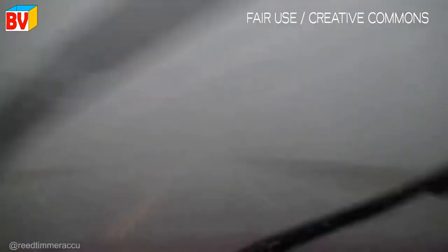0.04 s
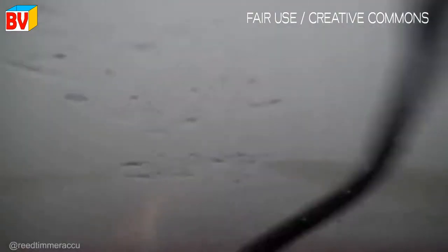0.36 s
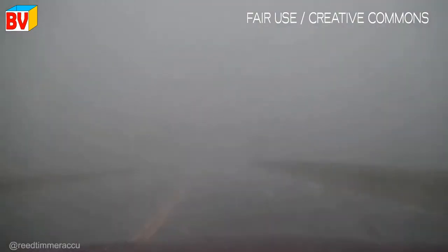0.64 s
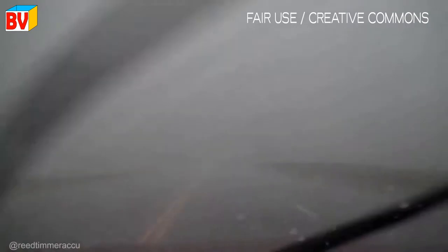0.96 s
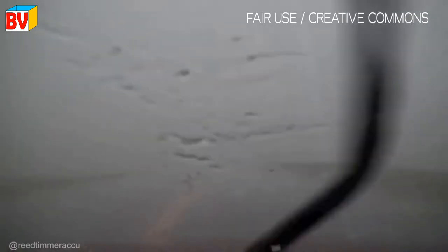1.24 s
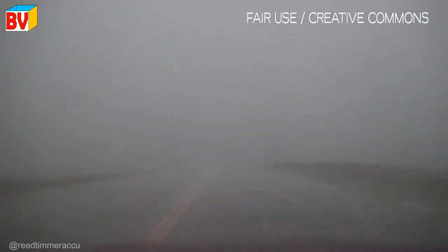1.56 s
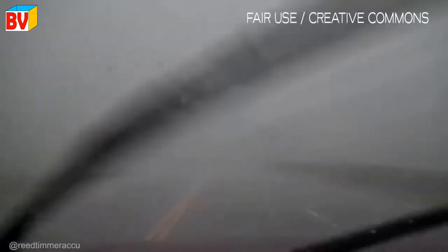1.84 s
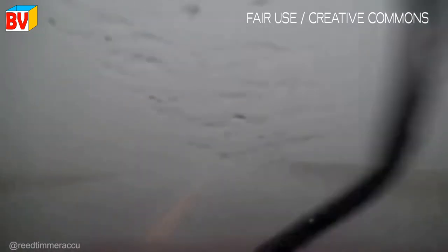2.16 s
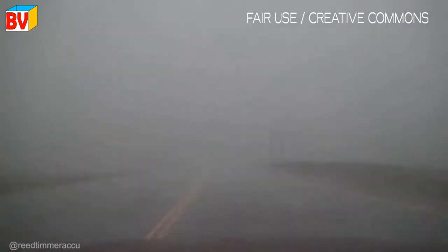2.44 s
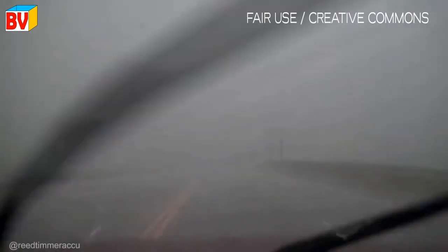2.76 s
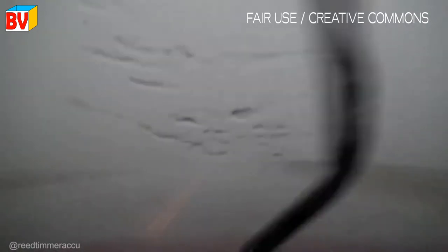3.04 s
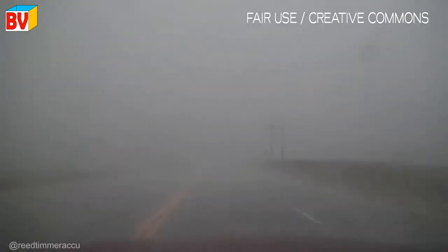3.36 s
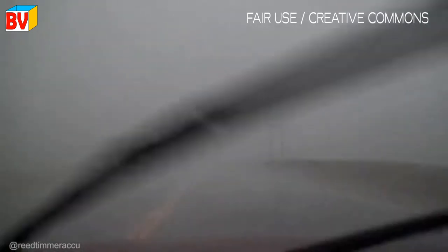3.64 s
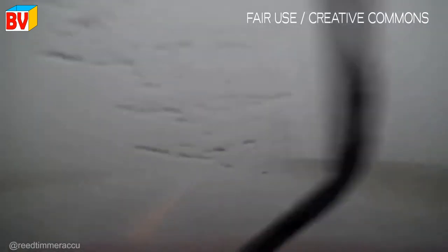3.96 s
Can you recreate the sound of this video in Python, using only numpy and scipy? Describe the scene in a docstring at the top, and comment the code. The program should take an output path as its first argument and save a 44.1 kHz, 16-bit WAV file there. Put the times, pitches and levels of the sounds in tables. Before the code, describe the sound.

Hailstones knock and clack unevenly on a creeping car from start to finish, heard inside. Each blow is short, the deeper ones booming briefly, while small ice pellets tick on the glass over constant rain hiss and engine rumble.

```python
"""A wash of heavy rain and low road rumble, with hail striking at once, heard inside a creeping car.
Stones thud and knock on the roof, crack on the windscreen and set the cabin air booming; each blow
is a spike plus a short, dense tail of reflections. Ice pellets tick on the glass.
A limiter holds down the hardest blows."""
import sys
import numpy as np
from scipy import signal
from scipy.fft import rfft, irfft
from scipy.io import wavfile
from scipy.ndimage import uniform_filter1d

SR = 44100
rng = np.random.default_rng(int(sys.argv[2]) if len(sys.argv) > 2 else 0)


def inscribe(sig):
    """Save sig as 16-bit PCM at rate SR to the path in sys.argv[1].

    A 1-D sig is mono; a 2-D sig holds one channel per row.
    Samples are clipped to [-1, 1] before scaling.
    """
    pcm = np.round(np.clip(np.atleast_2d(sig).T, -1, 1) * 32767)
    wavfile.write(sys.argv[1], SR, pcm.astype(np.int16))


N = 176400


def amp(db):
    """Decibels to gain."""
    return 10 ** (np.asarray(db) / 20)


def unit(x):
    """Scales to energy 1."""
    return x / np.sqrt(np.sum(x ** 2) + 1e-20)


def read(points, hz):
    """Interpolates a table on a log-frequency axis."""
    points_hz, values = np.transpose(points)
    return np.interp(np.log(hz + 1), np.log(points_hz + 1), values)


def add(mix, start_s, sound):
    """Mixes a sound in at start_s."""
    part = mix[round(start_s * SR):][:len(sound)]
    part += sound[:len(part)]


def band(x, low_hz, high_hz, order):
    """Causal band-pass; order sets the upper slope."""
    low_cut = signal.butter(3, low_hz, "high", fs=SR, output="sos")
    high_cut = signal.butter(order, high_hz, fs=SR, output="sos")
    return signal.sosfilt(np.vstack([low_cut, high_cut]), x + 1e-15)


def ring(x, hz, q):
    """One resonance, peak gain 1."""
    return signal.lfilter(*signal.iirpeak(hz, q, SR), x)


def drifting_noise(spectrum, patch_db, swell_db):
    """Noise of a given spectrum with drifting patches and a slow swell."""
    _, _, bins = signal.stft(rng.standard_normal(N), SR, nperseg=512)
    patches = uniform_filter1d(rng.standard_normal(bins.shape), size=7, axis=0)
    patches = uniform_filter1d(patches, size=9, axis=1)
    swell = uniform_filter1d(rng.standard_normal(bins.shape[1]), size=30)
    drift = amp(patch_db * patches / patches.std() + swell_db * swell / swell.std())
    noise = signal.istft(bins * drift, SR, nperseg=512)[1][:N]
    colour = amp(read(spectrum, np.fft.rfftfreq(N, 1 / SR)))
    return irfft(rfft(noise) * colour, N) * np.sqrt(SR / 2)


def blow(low_hz, high_hz, decay_s, direct_share, pitch_hz=1000, q=1, boost=0, order=4):
    """A direct spike and its reflections ring a panel; energy equals 30 ms at rms 1."""
    t = np.arange(SR // 6) / SR
    build_s = 0.0032 * (1 - direct_share) ** 2 + 1e-5  # far blows swell as they spread through the body
    swell = 1 - np.exp(-t / build_s)
    t60_s = decay_s * (1 - 0.3 * direct_share)  # direct blows on glass die sooner than on the roof
    age = t / t60_s
    early = amp(-60 * np.maximum(age - 0.031, 0))  # brief hold, then decay
    late = amp(-8.5 - 60 * age / 2.68)  # the cabin's weaker, longer tail
    drive = np.array([t == 0, rng.standard_normal(len(t)) * swell * (early + late)])
    spike, scatter = band(drive + boost * ring(drive, pitch_hz, q), low_hz, high_hz, order)
    hit = np.sqrt(direct_share) * unit(spike) + np.sqrt(1 - direct_share) * unit(scatter)
    return unit(hit) * np.sqrt(0.03 * SR)


# Rain spectrum: freq_hz, density_db
RAIN_SPECTRUM = [(100, -61), (300, -81), (600, -74), (1100, -79), (1700, -79), (2600, -83), (4300, -83),
                 (6500, -88.5), (9000, -92), (13000, -105), (15500, -106)]


def rain_wash():
    """Countless drops on the body merge into a hiss."""
    return drifting_noise(RAIN_SPECTRUM, patch_db=1.5, swell_db=0.7)


# Road and engine spectrum: freq_hz, density_db
RUMBLE_SPECTRUM = [(15, -85), (27, -87), (42, -62.5), (58, -79), (85, -62.5), (113, -53), (150, -58),
                   (220, -72.5), (400, -66.5), (1000, -100)]


def road_rumble():
    """Road and engine fill the cabin with low noise."""
    return drifting_noise(RUMBLE_SPECTRUM, patch_db=1, swell_db=0.6)


def patter(rate_per_s, low_hz, high_hz, decay_s, direct_share, level_db, spots=16):
    """Random small impacts of uneven size on spots of the body, each with its own pitch."""
    size_db = 5 * np.minimum(rng.exponential(1, N), 3.5)
    impacts = amp(size_db) * (rng.random(N) < rate_per_s / SR)
    spot = rng.integers(0, spots, N)
    out = np.zeros(N)
    for k, pitch_hz in enumerate(np.geomspace(low_hz, high_hz, spots)):
        response = blow(low_hz, high_hz, decay_s, direct_share, pitch_hz, q=2.95, boost=2.9)
        out += signal.oaconvolve(impacts * (spot == k), response)[:N]
    return amp(level_db) * unit(out) * np.sqrt(N)


# Hailstone impacts: start_s, thud_hz, thud_db, knock_hz, knock_db, crack_hz, crack_db,
# splinter_db, directness (0-1)
HAILSTONES = [(0.062, 248, -18.5, 1590, -25, 3580, -27, -36.5, 0.76),
              (0.0918, 319, -19.4, 977, -24.5, 2200, -37, -54, 0.7),
              (0.118, 404, -21.5, 1960, -27.5, 2030, -26.5, -32, 0.81),
              (0.157, 202, -30, 864, -33.6, 2200, -50, -64.4, 0.85),
              (0.2598, 411.6, -25.5, 525, -25.5, 4400, -47, -65, 0.67),
              (0.3291, 297.3, -25.5, 556, -20.7, 4683, -34.5, -45.5, 0.5),
              (0.3596, 211, -22, 893, -20.5, 4984, -34, -45, 0.44),
              (0.3969, 201.6, -19, 720, -23.5, 3680, -27, -36, 0.92),
              (0.4733, 445, -22, 851, -24, 2160, -33.5, -48, 0.47),
              (0.519, 321, -29, 624, -25.5, 2200, -67.5, -69, 0.67),
              (0.591, 374, -30.3, 1012, -27.5, 2160, -36, -51.2, 0.3),
              (0.6956, 398, -23.5, 672, -27, 2200, -55, -67.5, 0.68),
              (0.7732, 170.3, -31.5, 690, -34.5, 3920, -28.5, -39.5, 0.15),
              (0.818, 185.6, -30.5, 740, -27.5, 2720, -33.1, -42, 0.5),
              (0.8335, 339, -23.5, 563, -21.5, 2080, -33, -46.5, 0.38),
              (0.9051, 415, -25, 704, -29.5, 2640, -26, -32, 0.25),
              (0.941, 363, -18.5, 662, -21.5, 2900, -33.5, -54.5, 0.14),
              (0.9982, 142.4, -15.5, 710, -22.5, 2200, -54, -66, 0.15),
              (1.03, 167, -33, 656, -40, 3180, -43.5, -64, 0.05),
              (1.111, 189, -23.5, 591, -25, 2270, -35.6, -56.5, 0.32),
              (1.1977, 327, -25.5, 1031, -24, 3330, -36.5, -51.5, 0.51),
              (1.377, 176, -26.5, 693.6, -30, 3310, -43.5, -46.5, 0.6),
              (1.4163, 144, -41, 1530, -24.5, 5030, -26.5, -35.5, 0.99),
              (1.5266, 293, -28.5, 1764, -24, 3046, -30.5, -59, 0.74),
              (1.5641, 181, -27.5, 705, -21, 3130, -27.5, -40.5, 0.65),
              (1.691, 381, -21.5, 775, -19, 2050, -36, -42, 0.35),
              (1.8803, 185, -22, 925, -25.5, 2765, -26.4, -51, 0.73),
              (1.9105, 243.6, -22.5, 1880, -26.5, 2990, -28.9, -31.5, 0.84),
              (2.095, 144, -36, 1520, -38.4, 4530, -35.5, -35.5, 1),
              (2.11, 309, -27, 673, -33, 2200, -42.0, -64, 0.36),
              (2.1547, 403, -21, 678, -23.5, 2754, -32.5, -40.5, 0.93),
              (2.1907, 417, -31.5, 1130, -25, 4450, -30, -42.8, 1),
              (2.2293, 178, -21, 662, -24, 2200, -42.5, -54, 0.22),
              (2.256, 384.3, -21, 549, -30, 2200, -40, -51.5, 1),
              (2.267, 277, -17, 554, -28, 2870, -35, -36.5, 0.23),
              (2.3063, 219, -21, 1694, -25, 2104, -32.5, -40, 1),
              (2.382, 265, -27.5, 860, -28.5, 5652, -45, -56.5, 0.75),
              (2.4129, 258, -23.5, 1900, -26, 4420, -25, -35.5, 0.35),
              (2.4544, 438, -29, 1540, -26.0, 5950, -27.5, -36.5, 1),
              (2.58, 294, -25.5, 746, -29, 2170, -44.5, -52.5, 0.62),
              (2.7521, 396, -27, 1112, -31.5, 4650, -42.5, -51.5, 0.54),
              (2.934, 331, -30.5, 705, -35, 4597, -50, -59, 0.27),
              (3.0188, 384, -20, 758, -25, 3940, -25, -39.5, 0.42),
              (3.063, 159, -26.6, 633, -30.6, 2277, -49, -64.6, 0.75),
              (3.098, 380, -24, 1095, -23, 4130, -33, -45, 0.76),
              (3.165, 260, -42, 890, -44, 2400, -53, -55, 0.2),
              (3.2183, 431, -21.0, 850, -25.5, 2150, -29, -37, 0.84),
              (3.2448, 372, -24.5, 744, -21, 2600, -40.5, -58.5, 0.83),
              (3.316, 266.6, -26, 520, -37, 3380, -46, -50, 0.13),
              (3.356, 303, -28, 793, -35, 2500, -44, -55, 0.37),
              (3.377, 347, -18, 982, -23.5, 2500, -38.5, -54.5, 0.84),
              (3.475, 328, -23.5, 506, -29.5, 2200, -50, -62.5, 0.1),
              (3.5108, 239.7, -21.5, 1749, -29, 4575, -22, -29, 0.62),
              (3.617, 255, -19.5, 544, -20, 2560, -24, -34.5, 0.6),
              (3.656, 372, -28.5, 620, -23, 2180, -43, -59.5, 0.75),
              (3.753, 382, -24.5, 710, -30, 2180, -46, -54.6, 0.3),
              (3.775, 154, -25, 694, -32.1, 2200, -47.5, -65, 0.96),
              (3.8285, 266, -20, 570, -25.5, 4860, -30.5, -40, 0.85),
              (3.862, 156, -24.5, 1824, -30.5, 2200, -45, -65, 0.18),
              (3.8984, 339, -20.5, 659, -27.5, 3940, -34, -38, 0.05),
              (3.9459, 152.2, -19.5, 695, -22.5, 2220, -39, -50.5, 0.47),
              (3.958, 140, -18.5, 1447, -25, 3070, -27.5, -38, 0.36),
              (3.9905, 177, -24, 1238, -23, 2200, -38, -45, 0.8)]


def hail():
    """Each stone: a thud of the whole panel, a knock where it lands, a crack and splintering ice."""
    out = np.zeros(N)
    for stone in HAILSTONES:
        start_s, thud_hz, thud_db, knock_hz, knock_db, crack_hz, crack_db, splinter_db, directness = stone
        # a spot that rings lower is deeper and duller overall
        thud_low_hz = 111.3 * (thud_hz / 280) ** 0.43
        knock_high_hz = 1500 * (knock_hz / 800) ** 0.43
        crack_high_hz = 5120 * (crack_hz / 3300) ** 0.2
        thud = blow(thud_low_hz, 456, 0.099, 0.67 * directness, thud_hz, q=9.9, boost=2.2)
        knock = blow(450, knock_high_hz, 0.074, 0.719 * directness, knock_hz, q=7.6, boost=1.92)
        crack = blow(1850, crack_high_hz, 0.069, 0.76 * directness, crack_hz, q=8, boost=1.7)
        splinter = blow(5370, 8800, 0.054, 0.728 * directness, order=2)
        add(out, start_s, amp(thud_db) * thud + amp(knock_db) * knock)
        add(out, start_s, amp(crack_db) * crack + amp(splinter_db) * splinter)
    return out


def glass_clacks():
    """Stones ring the glass near one pitch, louder the more they both knock and crack."""
    out = np.zeros(N)
    for start_s, _, _, _, knock_db, _, crack_db, _, directness in HAILSTONES:
        clack = blow(1400, 2900, 0.042, 0.5 * directness, pitch_hz=1680, q=3.7, boost=1.02)
        add(out, start_s, amp((knock_db + crack_db) / 2 - 3.5) * clack)
    return out


def cabin_boom(pitch_hz=107.7, t60_s=0.15):
    """Each thud drives the lowest mode of the cabin air; deeper thuds drive it harder."""
    t = np.arange(SR // 4) / SR
    attack = 1 - np.exp(-2 * pitch_hz * t)
    mode = np.cos(2 * np.pi * pitch_hz * t) * attack * amp(-60 * t / t60_s)
    out = np.zeros(N)
    for start_s, thud_hz, thud_db, *_ in HAILSTONES:
        coupling = amp(-6) * (150 / thud_hz) ** 1.14
        add(out, start_s, amp(thud_db) * coupling * mode)
    return out


# Ice pellets on the glass: start_s, relative_db
ICE_PELLETS = [(0.0828, -47.5), (0.2844, -38.5), (1.3873, -35.5), (1.762, -32), (1.858, -40.5),
               (1.932, -46.5), (2.4476, -29.5), (2.633, -41), (2.6624, -34.5), (2.7777, -35), (2.831, -45),
               (2.9091, -37.5), (2.9408, -44.8), (3.4104, -39), (3.5938, -49)]


def pellets(gain_db=-4):
    """Light ice ticks on the windscreen without moving the panel."""
    out = np.zeros(N)
    for start_s, relative_db in ICE_PELLETS:
        tick = blow(2685, 9260, decay_s=0.0232, direct_share=0.36, order=2)
        add(out, start_s, amp(relative_db + gain_db) * tick)
    return out


# Glass and cabin resonances: centre_hz, width_hz, boost_ratio
CABIN_MODES = [(175.2, 60, 0.321), (610.2, 47.5, 0.54), (683, 55, 0.43), (1065, 23.3, 0.1),
               (1593.6, 39, 0.465), (4280, 37, 0.2), (6640, 170, 0.356)]
# Stereo balance: freq_hz, left_minus_right_db
STEREO_BALANCE = [(30, -1.3), (70, -3.2), (170, -3.2), (380, -1), (700, 1.2), (1300, 1.5), (2400, .5),
                  (5000, -.1)]


def cabin(x, reflection_s=0.0007):
    """Glass and cabin resonate; early reflections set left and right apart, most in the treble."""
    resonance = sum(boost * ring(x, hz, hz / width_hz) for hz, width_hz, boost in CABIN_MODES)
    mid = rfft(x + resonance)
    hz = np.fft.rfftfreq(N, 1 / SR)
    reflections = 1j * np.sqrt(2) * np.sin(2 * np.pi * hz * reflection_s)
    side = mid * reflections * amp(read([(2000, -22), (5000, -15)], hz))
    lean = amp(read(STEREO_BALANCE, hz) / 2)
    return irfft(np.array([(mid + side) * lean, (mid - side) / lean]), N)


def scene():
    """Rain, rumble and hail through the cabin; a faint second wash comes from all sides."""
    wash = rain_wash()
    drops = patter(296.5, 1501.5, 9500, decay_s=0.028, direct_share=0.35, level_db=-51.5)
    small_stones = patter(31, 260, 1498.5, decay_s=0.07, direct_share=0, level_db=-43)
    diffuse = amp(-30) * rain_wash()
    bed = wash + drops + small_stones + road_rumble()
    ice = hail() + glass_clacks() + cabin_boom() + pellets()
    return cabin(bed + ice) + np.array([diffuse, -diffuse])


def record(dry):
    """Fast, gentle limiter, soft overload, 42 ms of opening silence and a low-pass."""
    threshold_db, slope, peak_fall_db_per_s = -5.5, 0.24, 196
    peak_db = 20 * np.log10(abs(dry).max(0) + 1e-9)
    fall_db = np.arange(N) * peak_fall_db_per_s / SR
    held_db = np.maximum.accumulate(peak_db + fall_db) - fall_db
    over_db = np.maximum(held_db - threshold_db, 0)
    limited = dry / amp(slope * uniform_filter1d(over_db, size=40))
    saturated = limited / (1 + limited ** 4) ** (1 / 4)
    gate = np.arange(N) > 0.042 * SR
    low_pass = signal.firwin(255, 15700, window=("kaiser", 9), fs=SR)
    return signal.oaconvolve(saturated * gate, low_pass[None], "same")


dry = scene()
out = record(dry)
inscribe(out)
```